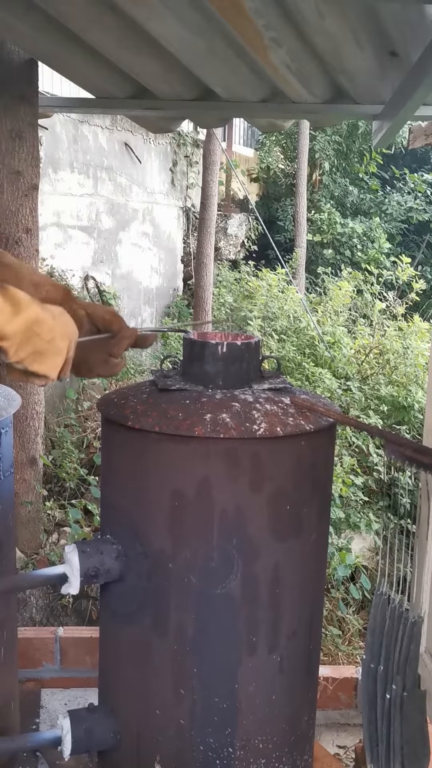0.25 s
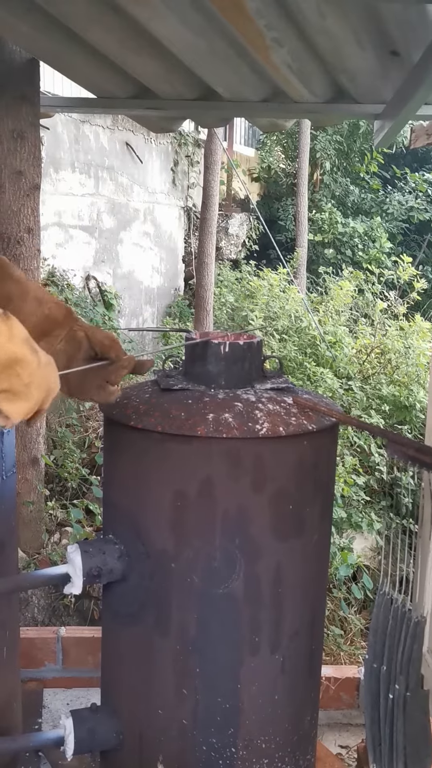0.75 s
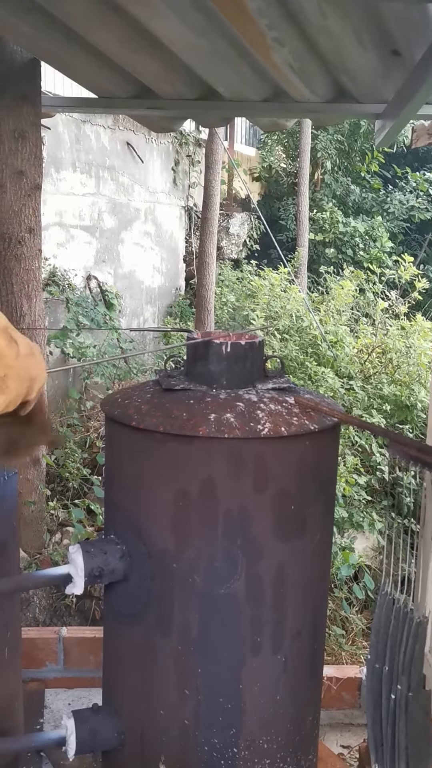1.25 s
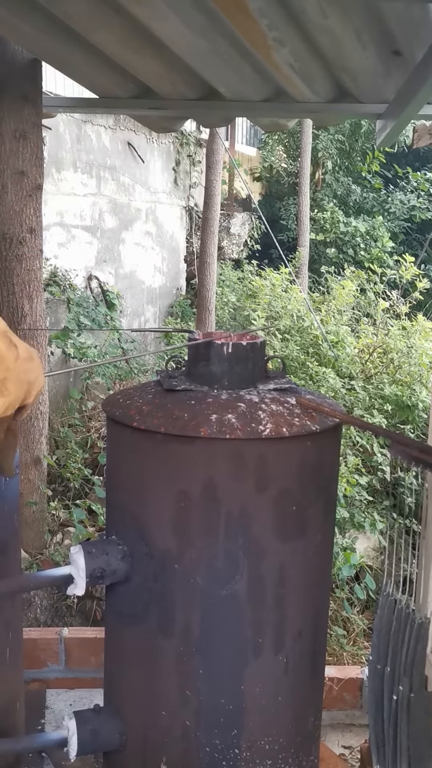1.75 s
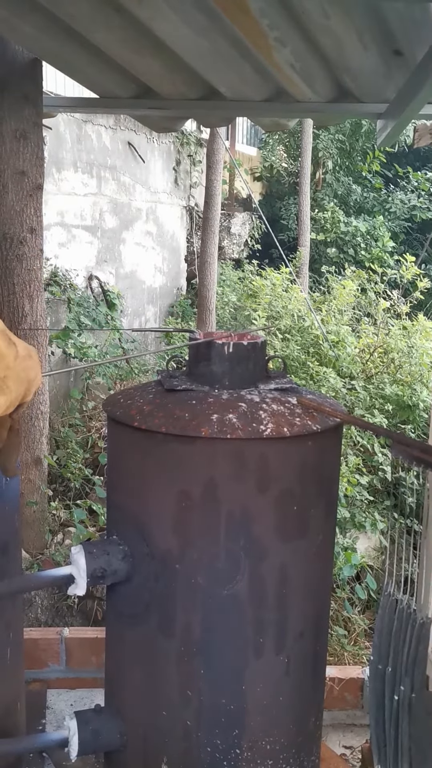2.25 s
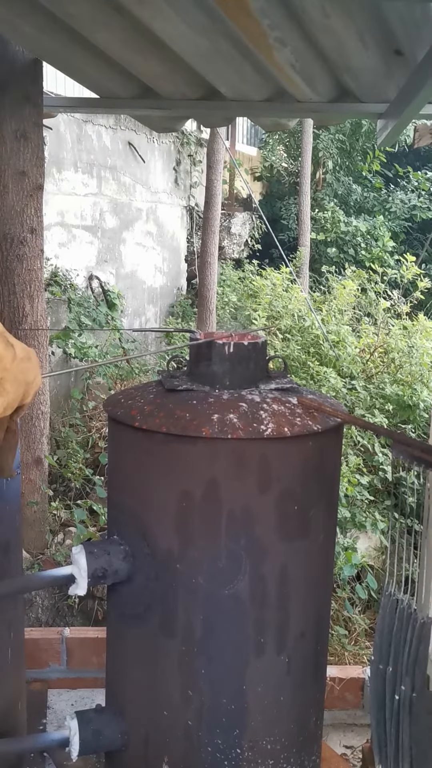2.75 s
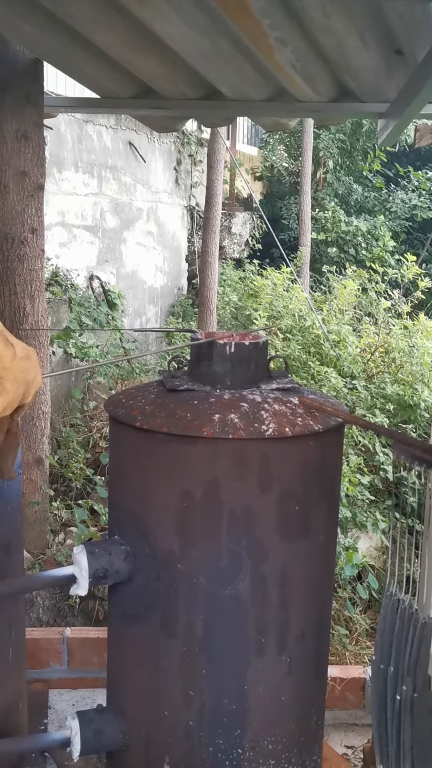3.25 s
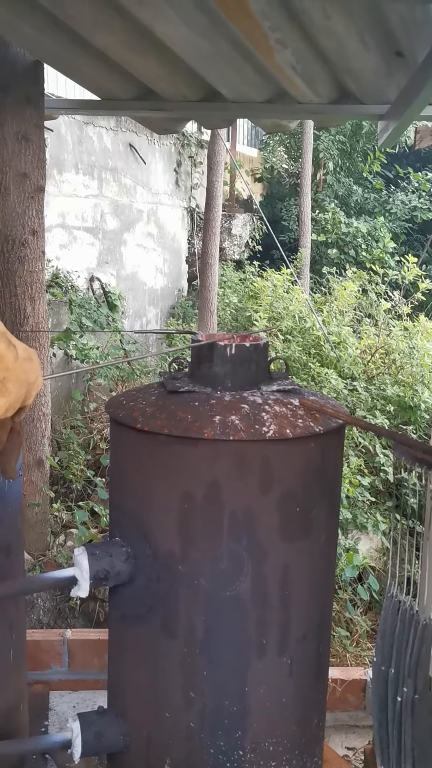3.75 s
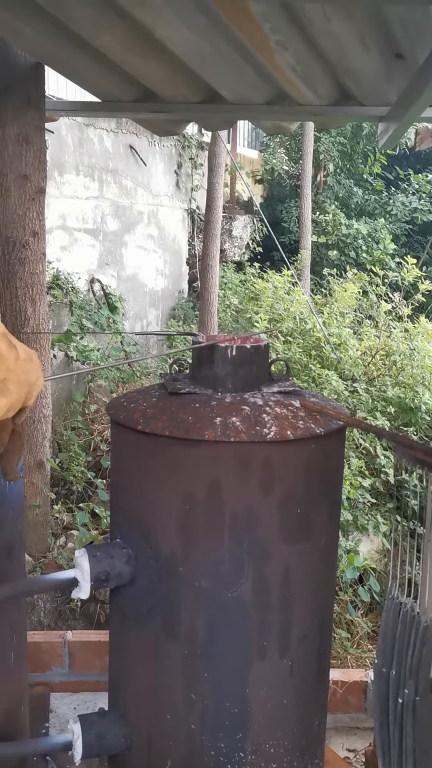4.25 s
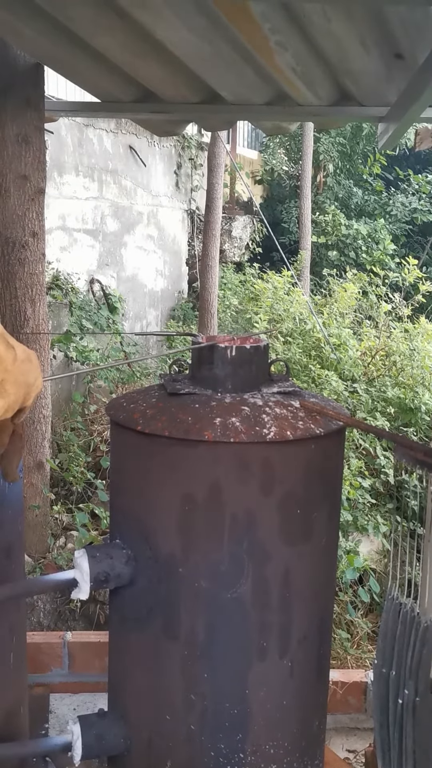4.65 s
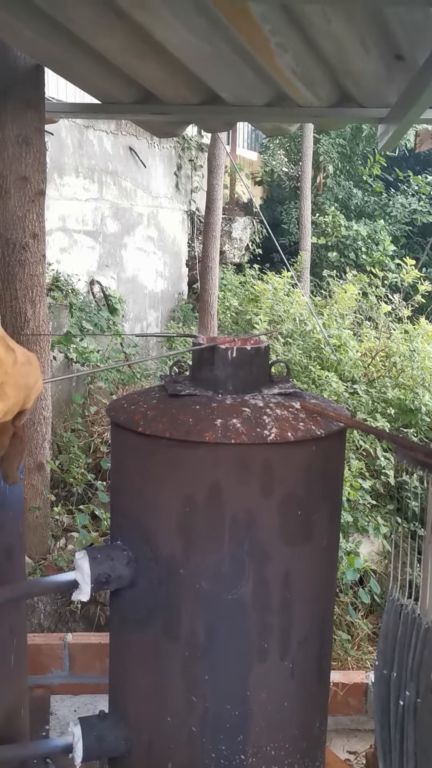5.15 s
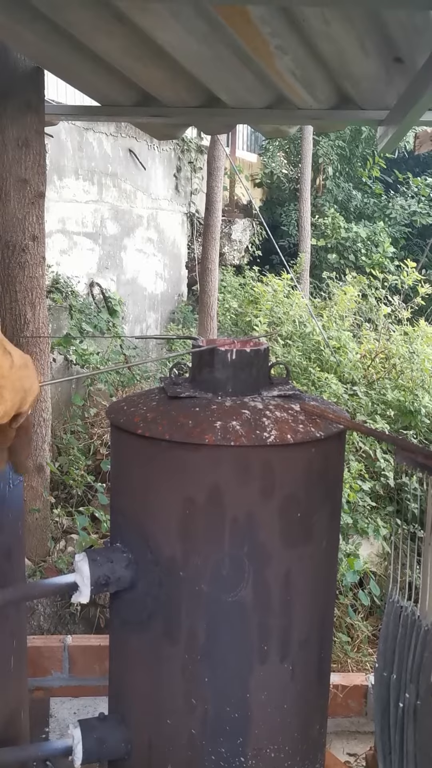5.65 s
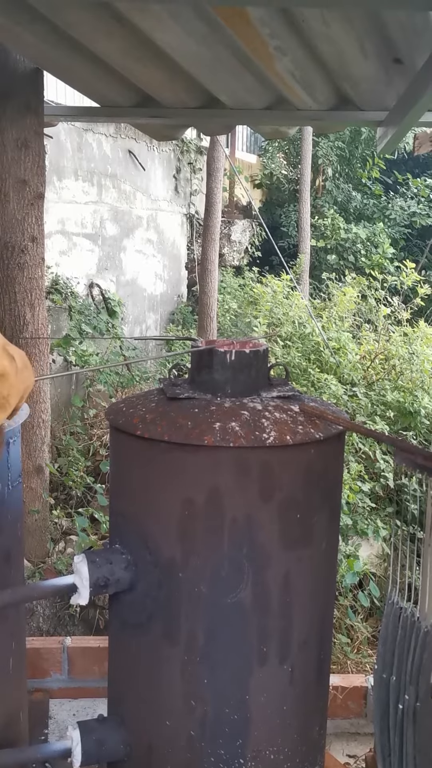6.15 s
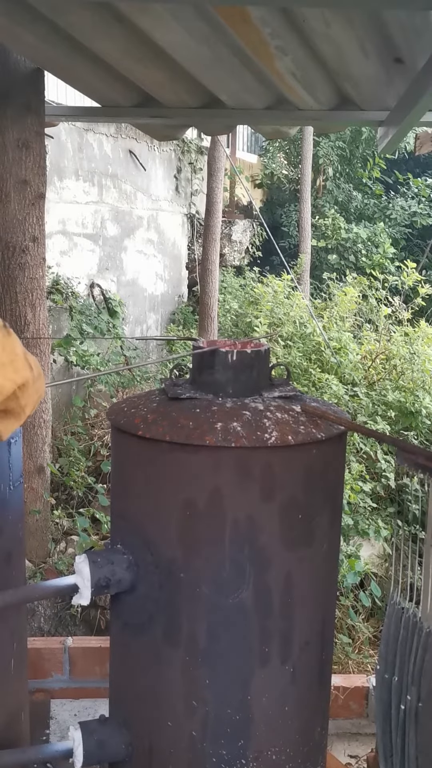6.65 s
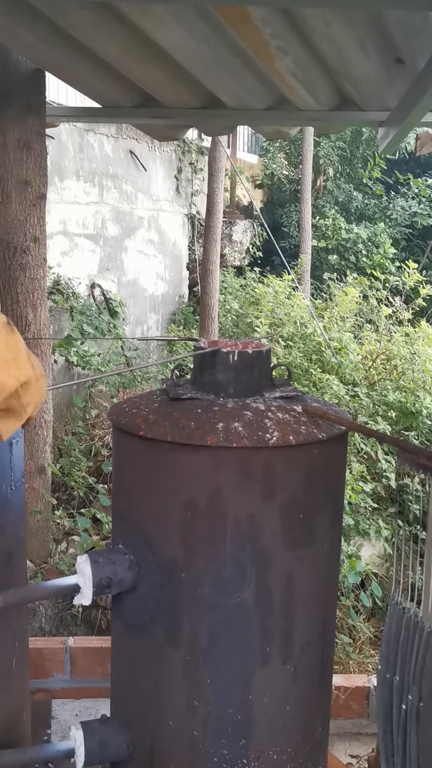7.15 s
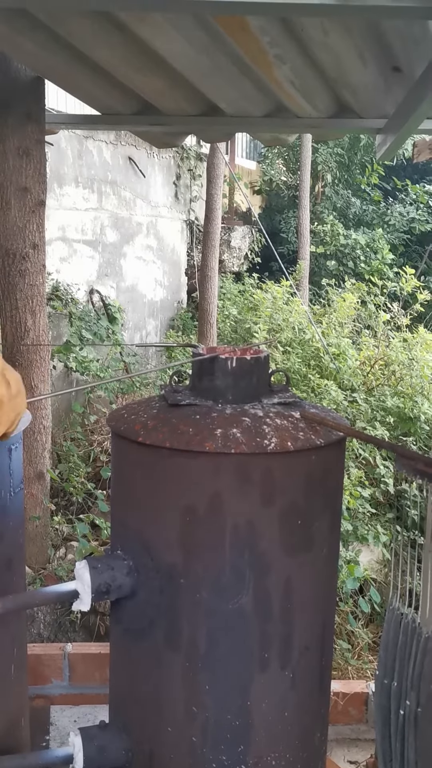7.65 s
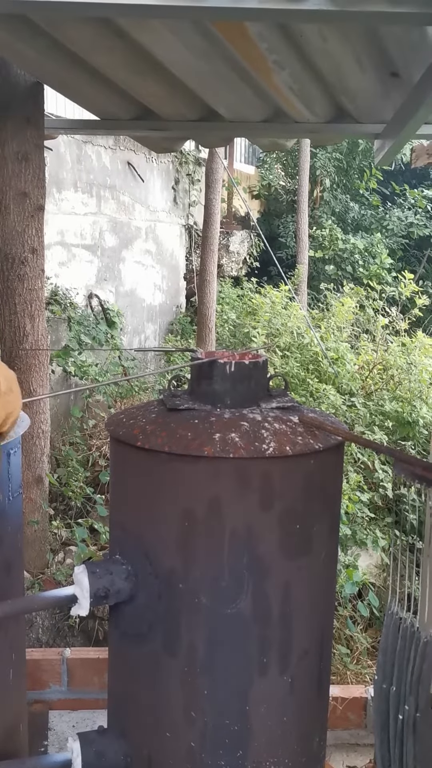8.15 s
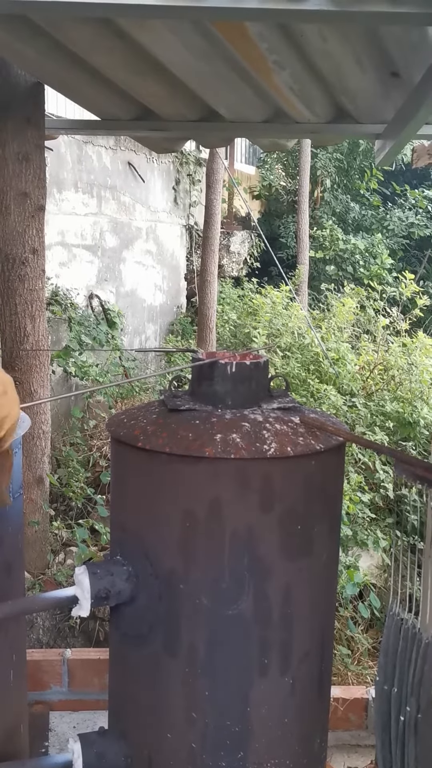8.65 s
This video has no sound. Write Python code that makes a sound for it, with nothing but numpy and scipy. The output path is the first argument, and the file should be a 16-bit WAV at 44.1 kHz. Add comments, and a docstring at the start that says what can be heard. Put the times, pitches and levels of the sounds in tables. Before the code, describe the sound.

Soft low rumble and outdoor air, with tiny metallic ticks. A gas burner bursts on with a bright spurt, then a heavy bass thump in a metal drum. The flame rumbles unevenly beneath a steady, pipe-coloured rush and sharp nozzle hiss, its bass growing firmer with heat. It stops suddenly with a quick upward hoot, and the quiet garden returns. Near stereo pickup in an open shed.

```python
"""Flame roar in a steel drum furnace under an open shed roof: noise shaped by the drum's air modes.
The gas burner is turned on, runs seven seconds and is shut off. The valve ticks and spits noise bursts, and
the gas lights with a thump of decaying modes. Air rushes as noise through the tube's pipe modes and the jet
hisses as high noise. As the flow dies the flame runs back up the tube with a short rising hoot, a gliding
sine. An insect chirps as pulsing narrow-band noise over the garden's low rumble and outdoor noise."""
import sys
import numpy as np
from scipy import signal
from scipy.fft import rfft, irfft, next_fast_len
from scipy.io import wavfile
from scipy.ndimage import uniform_filter1d

SR = 44100
rng = np.random.default_rng(int(sys.argv[2]) if len(sys.argv) > 2 else 0)


def unload_wav(signal):
    """Save mono or channel-first audio to the path in sys.argv[1] as 16-bit WAV at rate SR, clipped to [-1, 1]."""
    wavfile.write(
        sys.argv[1],
        SR,
        np.round(np.clip(np.atleast_2d(signal).T, -1, 1) * 32767).astype(np.int16),
    )


N = 393213
SIZE = next_fast_len(N)
TIME, HZ = np.arange(N) / SR, np.fft.rfftfreq(SIZE, 1 / SR)

# All mode widths are taken between the points 6 dB below the peak.
# Air modes of the drum: [centre f/Hz, width/Hz, relative level/dB]
DRUM_MODES = [(34.8, 10, -19), (52.8, 27, -8), (67, 18.4, 0), (100.8, 14, -9.5), (126.3, 17.6, -10.5),
              (140.4, 19, -13.5), (190.8, 28, -17), (220.4, 40, -26.5), (251.8, 30, -27), (320, 57, -33.5),
              (380, 29, -37.5), (425, 20, -36.5)]
# Sharpening of the jet as the burner runs: [t/s, relative hiss gain/dB]
JET_SHARPNESS = [(.8, 0.5), (5.5, 0.86), (6.5, 1.5), (7.75, 1.3)]

OPEN_AT, SHUT_AT = .7663, 7.758  # s, the valve opens and shuts
LIGHT_AT = .834  # s, the gas catches


def flame():
    """Combustion noise excites the drum's air modes: deep ones surge, upper ones follow the gas flow."""
    # Strength of the deep roar: [t/s, relative level/dB]
    roar_strength = [(0.9, -25), (1.51, -23), (4.36, -25), (4.42, -35), (4.45, -20.5), (4.72, -26.5),
                     (4.76, -20), (5.59, -27), (5.7, -20), (6.24, -22.5), (6.78, -19.5), (6.99, -26.5),
                     (7.07, -19), (7.36, -17.5), (7.39, -32), (7.51, -20), (7.55, -26), (7.8, -19.5)]
    # Stereo balance of the drum: [f/Hz, left-right level/dB]
    drum_balance = [(30, 4.5), (70, 4.5), (140, 1.5), (190, 6.5), (220, -1), (255, 3), (310, 2.5),
                    (450, -4.5)]
    side_db = across(drum_balance)
    roar = turbulence(resonances(DRUM_MODES), side_db)
    throb = steadied(turbulence(resonances([(66.3, 11.7, 0)]), side_db), 0.039)
    # with heat the main mode takes over
    mixed = roar + throb * amp(-9 + 12 * heat())
    strength_db = curve(roar_strength) + 0.67 + 1.13 * drift(7)
    surging = steadied(mixed, 0.11) * amp(strength_db)
    # the exponent slows the drain in proportion
    supply = flow(drain_db_per_s=120) ** 0.9
    even = roar * amp(-20 - 3 * heat()) * supply
    deep = 1 / (1 + (HZ / 112) ** 6)  # crossover at 112 Hz
    return filtered(surging * burning(), deep) + filtered(even * burning(), 1 - deep)


def ignition():
    """Impulsive excitation: gas gathered in the drum lights and rings its lowest modes, with a soft puff."""
    level_db, rise_s, damping = -7.5, 0.0081, 1.6  # damping: decay rate per Hz of mode width
    t = since(LIGHT_AT)
    ring = 0
    for hz, width, db in DRUM_MODES[:3]:
        ring = ring + amp(db) * np.exp(-damping * width * t) * np.sin(2 * np.pi * hz * t)
    swell = 1 - np.exp(-(t / rise_s) ** 2)
    puff_colour = amp(across([(200, -12), (1000, -9), (2000, 4), (3500, -10), (8000, -22)]))
    puff = turbulence(puff_colour) * amp(-40.5) * np.exp(-t / 0.018)
    left_right = amp([[2], [-2]])
    return swell * (amp(level_db) * left_right * ring + puff)


def burning():
    """Flame growth and extinction: its size, 0 to 1, spreads fast, holds, and shrinks when starved."""
    starve_at, spread_s, go_out_s = 7.81, 0.015, 0.072
    return ramp(LIGHT_AT, spread_s) * (1 - ramp(starve_at, go_out_s))


def heat():
    """Linear warming: the drum's warmth climbs from 0 to 1."""
    warm_from, hot_at = 4, 7.25  # s
    return ramp(warm_from, hot_at - warm_from)


def flow(drain_db_per_s):
    """Exponential filling and draining: gas flow, 0 to 1, builds at opening and drains from shutting."""
    build_s = 0.17
    return (1 - np.exp(-since(OPEN_AT) / build_s)) * amp(-drain_db_per_s * since(SHUT_AT))


def tube():
    """Pipe resonance: air drawn in by the jet excites the burner tube's modes over a broad rush."""
    # Air modes of the tube: [centre f/Hz, width/Hz, relative level/dB]
    tube_modes = [(524.8, 48, 1), (590, 124, -13), (793, 33, -11), (1033, 97, -5), (1377, 98, -8.5),
                  (1456, 64, -6.5), (1745, 136, -13.5), (1842, 54, -5.5), (1906, 49, -12.5),
                  (2260, 320, -12.5), (2500, 40, -12.5), (2626, 27, -9.5), (2852, 83, -12.5),
                  (2890, 19, -8), (2940, 49, -10), (2944, 150, -19), (3336, 67, -13.5)]
    # Spectral density of the broad rush: [f/Hz, relative density/dB per Hz]
    rush_density = [(200, -6), (400, -18), (700, -15), (900, -21.5), (1200, -16), (1600, -21.5),
                    (2100, -20), (3000, -16.5), (3600, -26), (6000, -38)]
    # Stereo balance of the tube: [f/Hz, left-right level/dB]
    tube_balance = [(400, -3.5), (600, 0.5), (980, -1.5), (1060, 2.5), (1250, -3), (1400, 0.5), (1470, 2),
                    (1730, -9), (1840, 8.5), (2100, -5.5), (2330, 3.5), (2520, -0.5), (2650, -1.5),
                    (2875, -7.5), (2950, 1)]
    side_db, broad = across(tube_balance), amp(across(rush_density))
    rush = np.linalg.norm(broad) * turbulence(broad, side_db)
    for first in range(3):  # each group of modes wavers on its own
        modes = resonances(tube_modes[first::3])
        waver = amp(1.3 * drift(7.7))
        rush += np.linalg.norm(modes) * turbulence(modes, side_db) * waver
    # a sharper jet feeds the modes above 2500 Hz more
    top = filtered(rush, 1 / (1 + (2500 / (HZ + 1)) ** 10))
    rush = unit(rush + top * (amp(1.24 * curve(JET_SHARPNESS)) - 1))
    level_db = -41.5 - 0.65 * heat() + .5 * drift(7.5)
    return shed(rush * flow(drain_db_per_s=148) * amp(level_db), wet_db=-10.5, t60=0.27)


def jet():
    """Jet noise: gas hisses from the nozzle and dies faster than the rush; a sharp jet half whistles."""
    # Resonances of the nozzle and its air intake: [centre f/Hz, width/Hz, relative level/dB]
    nozzle_modes = [(3746, 130, -9), (4092, 176, -4), (4460, 180, -7), (4890, 210, -9.5), (5534, 550, -4.5),
                    (6550, 145, -5), (7600, 130, -8.5), (8900, 510, -1.5), (9500, 640, -8.5),
                    (10570, 420, -7.5), (10920, 270, -6), (11770, 300, -8), (12470, 700, -9),
                    (15300, 900, -8.5)]
    # Spectral density of the broad hiss: [f/Hz, relative density/dB per Hz]
    hiss_density = [(1500, -63), (3500, -23), (5000, -16), (6600, -9.5), (7300, -15.5), (8300, -16),
                    (10000, -12), (12000, -14), (13800, -13.5), (15800, -11)]
    # Stereo balance of the jet: [f/Hz, left-right level/dB]
    jet_balance = [(3500, 2), (4200, -6), (5000, 5), (5600, -7), (7000, 4.5), (8000, -10), (8900, 2),
                   (9800, 1), (10900, -11), (12000, 1), (13000, -13), (13900, -2), (15200, -5)]
    side_db, sharpness_db = across(jet_balance), curve(JET_SHARPNESS)
    hiss = turbulence(resonances(nozzle_modes, amp(across(hiss_density))), side_db)
    whistle = turbulence(resonances([(10900, 250, 0)]), side_db)
    hiss += whistle * amp(-14 + 3 * sharpness_db)
    level_db = -43.5 + sharpness_db + 0.74 * drift(16)
    # the exponent slows the drain in proportion
    supply = flow(drain_db_per_s=260) ** 0.89
    return shed(hiss * supply * amp(level_db), wet_db=-7, t60=0.15)


def valve():
    """Pressure release: the handle ticks as it turns, then pent-up gas spits out and its hiss decays."""
    # Ringing of valve and nozzle under the sudden pressure: [centre f/Hz, width/Hz, relative level/dB]
    valve_modes = [(2980, 300, -17), (3560, 250, -5.5), (4720, 470, -2), (7000, 700, -9), (8520, 450, 1),
                   (10700, 810, 0.5), (11700, 450, -7), (13000, 500, -11), (15000, 600, -12)]
    # Spectral density of the spurting gas: [f/Hz, relative density/dB per Hz]
    spurt_density = [(500, -43), (2400, -18), (4000, -24), (5200, -9), (7000, -6), (10000, -5),
                     (14000, -15), (15500, -9)]
    # Spits of pent-up gas: [t after opening/s, level/dB, decay t60/s]
    gas_spits = [(0, -22.5, 0.029), (.0145, -39, .025)]
    # Ticks of the valve handle: [t/s, scrape level/dB, ring level/dB, decay t60/s]
    handle_ticks = [(.039, -60, -75, .015), (.486, -64, -76, .14), (.5626, -56, -55, .08)]
    # Note of the ringing handle: [centre f/Hz, width/Hz, relative level/dB]
    handle_mode = [(13000, 320, 0)]
    attack_s, hiss_t60 = .001, .27
    gas = turbulence(resonances(valve_modes, amp(across(spurt_density))), side_db=-1.0)
    gas *= amp(1.5 * np.tanh(drift(500)))  # uneven sputter
    hiss = ramp(OPEN_AT, attack_s) * amp(-31 - 60 * since(OPEN_AT) / hiss_t60)
    spits = 0
    for delay, db, t60 in gas_spits:
        at = OPEN_AT + delay
        spits = spits + ramp(at, attack_s) * amp(db - 60 * since(at) / t60)
    duller = filtered(gas, 1 / (1 + (HZ / 13500) ** 6))
    out = gas * spits + duller * hiss
    scrape = turbulence(amp(across([(1000, -12), (4000, -1), (11000, 0), (16000, -6)])))
    ring = turbulence(resonances(handle_mode))
    for at, scrape_db, ring_db, t60 in handle_ticks:
        t = since(at)
        decay = (t > 0) * amp(-60 * t / t60)
        out += decay * (amp(ring_db) * ring + amp(scrape_db) * scrape)
    return shed(out, wet_db=-9, t60=0.24)


def flashback():
    """Sound speed rises with temperature: hot gas fills the tube, so its lowest mode hoots upward."""
    # Upper modes of the hot tube: [centre f/Hz, width/Hz, relative level/dB]
    hot_modes = [(694, 550, -6), (1130, 220, -1), (1590, 170, 3), (2070, 160, 5), (2640, 200, -2),
                 (2980, 220, -3), (4300, 1800, -17)]
    peak_at, rise_db_per_s, fall_db_per_s = 7.85, 380, 290
    cold_hz, hot_hz, glide_at, glide_s = 535, 708, 7.841, .032
    swell = amp(-rise_db_per_s * np.maximum(peak_at - TIME, 0) - fall_db_per_s * since(peak_at))
    filled = (1 + np.tanh((TIME - glide_at) / glide_s)) / 2
    hz = cold_hz + (hot_hz - cold_hz) * filled + 12 * drift(57)
    phase = 2 * np.pi * np.cumsum(hz) / SR
    hoot = unit(np.sin(phase)) * amp(-37 + 2.0 * drift(40))
    breath = amp(-40) * turbulence(resonances(hot_modes))
    return shed((hoot + breath) * swell, wet_db=-7, t60=0.27)


def insect():
    """Amplitude modulation: an insect's narrow-band rasp pulses about eight times a second."""
    chirp_hz, crest_at = 8.3, 7.1  # crest in s, before the timing strays
    cycles = chirp_hz * (TIME - crest_at) + 0.04 * drift(2.9)
    rasp = turbulence(resonances([(8950, 580, 0)]), side_db=3)
    return rasp * amp(-70.5 + 2.6 * np.cos(2 * np.pi * cycles))


def garden():
    """Incoherent addition: distant outdoor noise over a low rumble whose swells add as powers."""
    # Spectral density of the outdoor noise: [f/Hz, relative density/dB per Hz]
    garden_density = [(20, -10), (100, -2), (160, -2), (310, -2), (400, -12.5), (750, -8.5), (1000, -10),
                      (1400, -17.5), (1900, -17), (3000, -23), (5000, -30.5), (7500, -36), (11000, -36),
                      (15800, -43)]
    # Swells of the rumble: [centre t/s, added level/dB, Gaussian length/s]
    swells = [(.07, -41, 0.12), (.48, -46, .25), (8.575, -47, 0.064), (8.87, -51, .12)]
    air = turbulence(amp(across(garden_density))) * amp(-54 + .5 * drift(3.8))
    rumble_colour = resonances([(29.8, 20, -7), (62.5, 27, 3.0)])
    rumble = steadied(turbulence(rumble_colour, side_db=5.0), 0.17)
    power = amp(-52) ** 2
    for at, db, length in swells:
        power = power + amp(db) ** 2 * np.exp(-((TIME - at) / length) ** 2)
    return air + rumble * np.sqrt(power)


def shed(x, wet_db, t60, count=40):
    """Comb filtering: reflections from drum, posts and roof differ at each microphone."""
    echoes = np.zeros((2, SR // 8))
    for ear in echoes:
        delay = rng.uniform(.006, .07, count)
        ear[(delay * SR).astype(int)] = rng.choice([-1, 1], count) * amp(-60 * delay / t60)
        ear *= amp(wet_db) / np.linalg.norm(ear)
    echoes[:, 0] = 1  # direct sound
    return signal.oaconvolve(x, echoes / np.linalg.norm(echoes[0]), axes=1)[:, :N]


def turbulence(colour, side_db=0.):
    """Partial coherence: coloured noise at two microphones, alike in the bass, nearly unrelated in the treble."""
    # Coherence of the two microphones: [f/Hz, correlation (dimensionless)]
    coherence = [(100, 1), (160, 1), (260, 0.86), (330, 0.64), (430, 0.98), (520, 0.69), (780, 0.33),
                 (1000, -0.12), (1400, -0.17), (2000, -0.14), (2700, -0.18), (4000, 0.039)]
    a, b = rfft(rng.standard_normal((2, SIZE)))
    same = np.clip(across(coherence), -1, 1)
    left = a * amp(side_db / 2)
    right = (same * a + np.sqrt(1 - same ** 2) * b) / amp(side_db / 2)
    return unit(irfft(np.array([left, right]) * colour, SIZE)[:, :N])


def resonances(modes, base=0.):
    """Modal superposition: gain of steep resonances whose powers add to a broad base."""
    power = sum(amp(db) ** 2 / (1 + (2 * (HZ - hz) / width) ** 2) ** 2 for hz, width, db in modes)
    return np.sqrt(power + base ** 2)


def drift(rate_hz):
    """Low-pass noise: slow random wander of rms 1."""
    return unit(filtered(rng.standard_normal(N), 1 / (1 + (HZ / rate_hz) ** 2)))


def steadied(x, seconds):
    """Power normalization: evens out the chance swells of a noise, leaving rms near 1."""
    span = int(seconds * SR)
    power = uniform_filter1d(uniform_filter1d((x ** 2).mean(0), span), span // 2)
    return x / np.sqrt(power)


def filtered(x, gain):
    """Linear filtering: multiplies the spectrum by a gain given at every bin."""
    return irfft(rfft(x, SIZE) * gain, SIZE)[..., :N]


def across(points):
    """Logarithmic frequency scale: interpolates a table at every bin."""
    hz, value = np.transpose(points)
    return np.interp(np.log(HZ + 1), np.log(hz + 1), value)


def curve(rows):
    """Linear interpolation: a control curve at every sample."""
    t, value = np.transpose(rows)
    return np.interp(TIME, t, value)


def since(at):
    """Elapsed time: seconds since a moment, zero before it."""
    return np.maximum(TIME - at, 0)


def ramp(at, seconds):
    """Linear onset: climbs from 0 to 1, starting at a moment."""
    return np.clip((TIME - at) / seconds, 0, 1)


def amp(db):
    """Level to amplitude: decibels to gain."""
    return 10 ** (np.asarray(db) / 20)


def unit(x):
    """Root-mean-square scaling: brings a signal to rms 1."""
    return x / np.sqrt(np.mean(x ** 2) + 1e-20)


def scene():
    """Superposition: the drum, the burner and the garden around them add linearly."""
    left_lag_s = 0.00018  # the drum's sound reaches the left microphone later
    lag = np.exp(-2j * np.pi * np.outer([left_lag_s, 0], HZ))
    drum = filtered(flame() + ignition(), lag)
    return drum + tube() + jet() + valve() + flashback() + insect() + garden()


def record(dry):
    """Band limiting: the microphone's bass roll-off and an upper band edge."""
    bass_cut = signal.butter(2, 18, "highpass", fs=SR, output="sos")
    thinned = signal.sosfilt(bass_cut, dry)
    band_limit = signal.firwin(801, 15820, window=("kaiser", 9), fs=SR)
    return signal.oaconvolve(thinned, band_limit[None], "same")


dry = scene()
out = record(dry)
unload_wav(out)
```